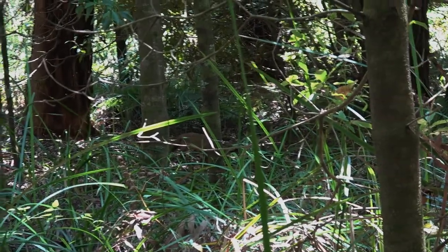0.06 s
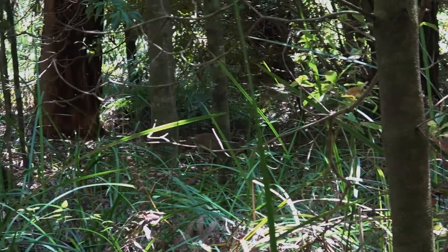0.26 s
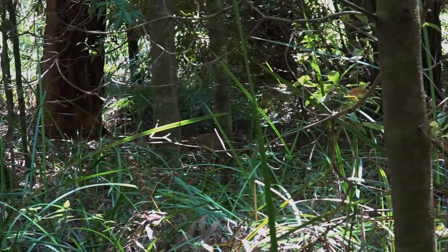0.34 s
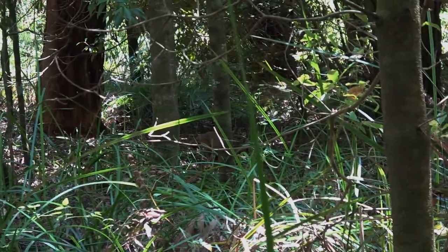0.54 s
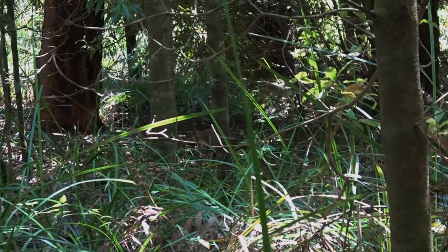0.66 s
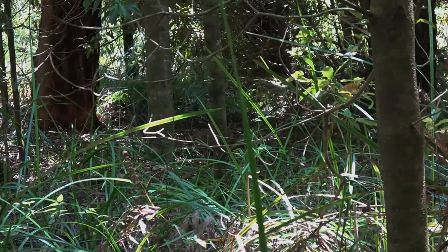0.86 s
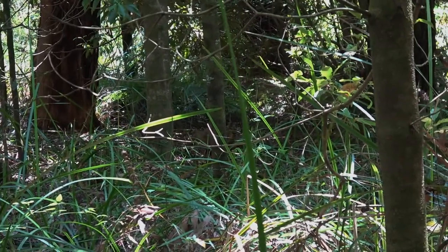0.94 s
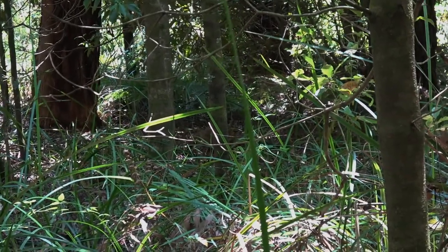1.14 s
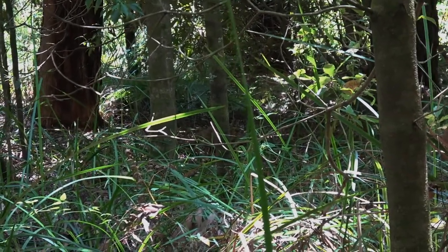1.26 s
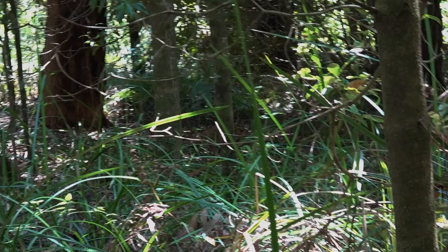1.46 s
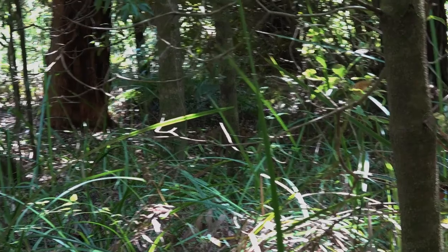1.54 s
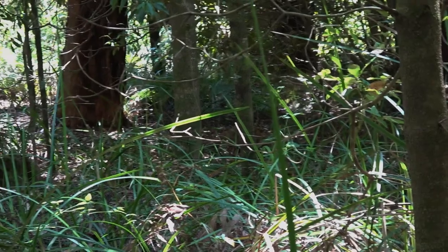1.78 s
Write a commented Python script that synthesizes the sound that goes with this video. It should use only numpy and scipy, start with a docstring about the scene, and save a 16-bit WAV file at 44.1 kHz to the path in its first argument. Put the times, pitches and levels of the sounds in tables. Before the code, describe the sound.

A whipbird holds a thin whistle, then cracks upward like a whip, echoing through trees.

```python
"""Bushland, an eastern whipbird a little right of the microphone. Its thin whistle swells in seven
throbs, dives an octave, pauses and cracks upward like a whip. Trunks and leaves scatter the call into
a long tail. Small birds pipe farther off, over swells of insect hiss and a low, distant drone."""
import sys
import numpy as np
from scipy import signal
from scipy.fft import rfft, irfft
from scipy.io import wavfile
from scipy.ndimage import uniform_filter1d

SR = 44100
rng = np.random.default_rng(int(sys.argv[2]) if len(sys.argv) > 2 else 0)


def bounce(signal):
    """Save signal as a 16-bit WAV file at the path given by the first command-line argument."""
    frames = np.transpose(np.atleast_2d(signal))
    limited = np.clip(frames, -1, 1)
    pcm = np.round(limited * 32767).astype(np.int16)
    wavfile.write(sys.argv[1], SR, pcm)


N = 79380

# the downward glide that takes over from the whistle (time [s], pitch [Hz], relative level [dB])
DIVE_PATH = [(.885, 3445, -52), (.908, 3388, -28), (.928, 2763, -29), (.95, 2450, -31.5), (.974, 2050, -33),
             (.998, 1740, -38), (1.035, 1739, -45)]


def undb(db):
    """Decibels to gain."""
    return 10 ** (np.asarray(db) / 20)


def unit(x):
    """Scale to an rms of 1."""
    return x / np.sqrt(np.mean(x ** 2))


def pan(x, db):
    """Place a sound by its left minus right level."""
    return x * undb(np.array([[.5], [-.5]]) * db)


def per_bin(points):
    """Join (frequency [Hz], level [dB]) points on a log-frequency axis."""
    hz, db = np.array(points, float).T
    return np.interp(np.log(np.fft.rfftfreq(N, 1 / SR) + 1), np.log(hz), db)


def noise(colour, side):
    """Coloured stereo noise; side is the gain of the part that differs between left and right."""
    mid, wide = irfft(rfft(rng.standard_normal((2, N))) * undb(per_bin(colour)), N)
    return unit(mid) + side * unit(wide) * np.array([[1], [-1]])


def band(hz, width):
    """Narrow noise around one frequency; around 0 Hz it is a random waver."""
    f = np.fft.rfftfreq(N, 1 / SR)
    return unit(irfft(rfft(rng.standard_normal(N)) * np.exp(-((f - hz) / width) ** 2), N))


def forest(x, near_db=0, far_db=0):
    """Add quick scatter from near foliage, one echo off a big trunk and a long tail from trees beyond."""
    # colour of the scattered sound (frequency [Hz], level [dB])
    scatter = [(1700, 0.5), (2700, -1), (3400, -2.5), (4200, -1.5), (5200, 3.5), (7500, 2), (12000, -1.5)]
    age = np.maximum(np.arange(N) / SR - .002, 0)  # the first scatter arrives 2 ms late
    near, far = (unit((age > 0) * undb(-60 * age / t60)) / np.sqrt(N) for t60 in (.3, .97))
    grain = irfft(rfft(rng.standard_normal((2, N))) * undb(per_bin(scatter)), N)
    mid, wide = grain * np.hypot(undb(near_db) * near, undb(far_db) * far)
    echoes = mid + .2 * wide * np.array([[1], [-1]])
    trunk = undb(-16) * np.pad(x, (int(.052 * SR), 0))[:N]
    return x + trunk + signal.fftconvolve(x[None], echoes, axes=1)[:, :N]


def syrinx(hz, level, overtones, near_db, far_db):
    """The whipbird's voice through the trees: a nearly pure, wavering tone with faint overtones."""
    waver, full_voice_db, rolloff_hz = .0018, -13, 13000
    phase = 2 * np.pi * np.cumsum(hz * (1 + waver * band(0, 90))) / SR
    effort = (level / undb(full_voice_db)) ** .54  # overtones grow faster than the note itself
    upper = sum(undb(db) * np.sin(k * phase) / np.hypot(1, (k * hz / rolloff_hz) ** 10)
                for k, db in overtones)
    upper = forest(undb(-2) * effort * level * upper, near_db=2.4, far_db=4.5)
    fundamental = forest(level * np.sin(phase), near_db, far_db)
    return np.sqrt(2) * (fundamental + upper)


def whistle(t):
    """One breathy held note that builds in throbs, its pitch sagging within most of them."""
    # throbs (start [s], peak [s], end [s], relative level [dB], first pitch [Hz], last pitch [Hz])
    throbs = [(-.02, .05, .08, -33.5, 3720, 3555), (.112, .168, .206, -29, 3600, 3510),
              (.25, .298, .324, -23, 3610, 3525), (.374, .42, .474, -22.5, 3580, 3510),
              (.497, .535, .572, -22, 3600, 3480), (.615, .686, .707, -15.5, 3555, 3555),
              (.757, .82, .842, -16, 3650, 3430)]
    # overtones of the whistle (multiple of the pitch, relative level [dB])
    overtones = [(2, -49.5), (3, -42)]
    # air in the whistle (frequency [Hz], relative level [dB])
    breath_colour = [(2000, -38.5), (2450, -18.5), (2720, -7), (3050, -6), (3450, 5), (3800, -3),
                     (4200, -29.5), (6000, -42)]
    held_db, held_hz = -22.5, 3523  # the note carries on this far below the throbs
    _, peaks, ends, peak_db, _, _ = np.array(throbs).T
    fade_into_dive = np.interp(t, [ends[-1], DIVE_PATH[1][0]], [1, 0])
    level = undb(np.interp(t, peaks, peak_db) + held_db) * fade_into_dive + 1e-9
    weighted_hz = level * held_hz
    for start, peak, end, db, first_hz, last_hz in throbs:
        rise = np.clip((t - start) / (peak - start), 0, 1)
        fall = np.clip((end - t) / (end - peak), 0, 1)
        throb = undb(db) * np.sin(rise * np.pi / 2) ** 2 * np.sin(fall * np.pi / 2) ** 1.49
        sag = np.clip((t - start) / (end - start), 0, 1) ** .7
        level += throb
        weighted_hz += throb * (first_hz + (last_hz - first_hz) * sag)
    breath = undb(-28.5) * level * noise(breath_colour, side=0)[0]
    return syrinx(weighted_hz / level, level, overtones, near_db=-26, far_db=-15) + forest(breath)


def small_bird_note(t, start, length, first_hz, last_hz, db):
    """A rounded, pure note with a slight waver in pitch."""
    progress = np.clip((t - start) / length, 0, 1)
    hz = (first_hz + (last_hz - first_hz) * progress) * (1 + .0061 * band(0, 150))
    envelope = undb(db) * np.sqrt(2 * np.abs(np.sin(np.pi * progress)))
    return envelope * np.sin(2 * np.pi * np.cumsum(hz) / SR)


def small_birds(t):
    """Steady pipings and slurred chirps from deeper in the trees."""
    # thin notes on one pitch (start [s], length [s], pitch [Hz], relative level [dB])
    pipe_notes = [(-.03, 0.1, 5505, -55), (0.062, 0.17, 5494, -70.5), (0.052, 0.15, 4910, -68.5),
                  (1.398, 0.044, 4963, -44), (1.525, .06, 4963, -52.5), (1.542, 0.024, 6112, -45.5),
                  (1.58, 0.049, 6065, -51), (1.706, 0.048, 5165, -47.5), (1.788, 0.058, 5170, -41)]
    # short slurs (start [s], length [s], first pitch [Hz], last pitch [Hz], relative level [dB])
    chirp_notes = [(1.295, 0.035, 1512, 1330, -62.5), (1.414, 0.032, 2745, 2585, -56.5),
                   (1.505, 0.026, 2120, 2440, -58), (1.576, 0.019, 7230, 7900, -51),
                   (1.581, 0.029, 7380, 8300, -57), (1.722, .035, 3830, 2860, -58),
                   (1.76, 0.029, 3000, 3710, -60)]
    pipes = sum(small_bird_note(t, start, length, hz, hz, db) for start, length, hz, db in pipe_notes)
    chirps = sum(small_bird_note(t, *row) for row in chirp_notes)
    return pan(forest(pipes, near_db=-16, far_db=-2) + forest(chirps), -2)


def swells(t, rows):
    """Soft, bell-shaped rises and falls of level."""
    return sum(undb(db) * np.exp(-.5 * ((t - middle) / width) ** 2) for middle, width, db in rows)


def insects_and_air(t):
    """Two kinds of fluttering insect hiss swell over the steady air, spread around the microphone."""
    # the broad insect hiss (frequency [Hz], relative level [dB])
    hiss_colour = [(3500, -29), (4800, -2), (6000, 2), (7500, 4), (9000, -2), (10500, -14), (13000, -11),
                   (15500, -16)]
    # swells of the broad hiss (middle [s], half width [s], relative level [dB])
    broad_swells = [(.155, 0.028, -60), (.405, 0.041, -56), (.57, 0.054, -58), (.71, 0.045, -60.5),
                    (0.839, 0.056, -67.5), (0.998, 0.043, -61), (1.63, 0.042, -70), (1.75, 0.057, -64)]
    # swells of a thinner, higher hiss (middle [s], half width [s], relative level [dB])
    thin_swells = [(.14, .035, -68.5), (1.02, 0.11, -73), (1.24, 0.048, -66.5), (1.62, 0.044, -68.5)]
    # the still air of the bush (frequency [Hz], relative level [dB])
    air_colour = [(600, -44), (1400, -5), (1900, -1), (2700, -2), (4000, -1), (6000, 0.5), (8000, -6),
                  (10000, -11), (13000, -7.5), (15500, -24)]
    broad = noise(hiss_colour, side=.39) * swells(t, broad_swells)
    thin = band(hz=12460, width=1600) * swells(t, thin_swells)
    flutter = undb(.66 * band(0, 50))
    air = undb(-61.5) * noise(air_colour, side=.39)
    return pan((broad + thin) * flutter + air, -.5)


def drone():
    """A far, low wash with two narrow, wavering hums in it."""
    # the low wash (frequency [Hz], relative level [dB])
    colour = [(20, -6.5), (40, -4.5), (60, 3.5), (85, -3.5), (100, -6.5), (118, -0.5), (150, -12.5),
              (250, -10), (400, -9), (590, -4), (760, -4), (900, -12), (1080, -8.5), (1300, -17.5),
              (1600, -24), (2500, -57)]
    # where each part of the wash sits (frequency [Hz], left minus right [dB])
    balance = [(60, -0.5), (120, 0.5), (200, -4), (350, 4.5), (700, 0.5), (1000, 3.5), (1300, -9.5)]
    # hums (frequency [Hz], width [Hz], level [dB], left minus right [dB])
    hum_bands = [(76.6, 7.6, -57, -3.5), (1183.4, 69.6, -59.5, -13.5)]
    wash = irfft(pan(rfft(noise(colour, side=.23)), per_bin(balance)), N)
    hums = sum(pan(undb(db) * band(hz, width), lean) for hz, width, db, lean in hum_bands)
    return undb(-51.5) * wash + hums


def glide(t, path, overtones, near_db, far_db):
    """A fast, uneven sweep of the whipbird's voice, smeared into a band of noise by the echoes."""
    edge_s, surge_db, unevenness_hz, wobble = .0018, 2.5, 89.5, .0051
    times, hz, db = np.array(path).T
    gate = np.clip(np.minimum(t - times[0], times[-1] - t) / edge_s, 0, 1)
    pitch = uniform_filter1d(np.interp(t, times, hz), size=300) * (1 + wobble * band(0, unevenness_hz))
    level = gate * undb(np.interp(t, times, db) + surge_db * band(0, unevenness_hz))
    return syrinx(pitch, level, overtones, near_db, far_db)


def dive(t):
    """The whistle drops an octave and fades."""
    # overtones, stronger than in the whistle (multiple of the pitch, relative level [dB])
    overtones = [(2, -33), (3, -34)]
    return glide(t, DIVE_PATH, overtones, near_db=-4, far_db=-6.5)


def whip_crack(t):
    """After a pause the voice shoots up more than an octave and rings through the trees."""
    # the upward glide (time [s], pitch [Hz], relative level [dB])
    path = [(1.112, 3370, -46), (1.127, 3273, -25.5), (1.143, 3532, -21), (1.16, 3905, -21.5),
            (1.177, 4676, -25), (1.192, 5600, -28), (1.208, 6600, -32.5), (1.22, 7020, -33.5),
            (1.232, 7780, -51)]
    # overtones of the crack (multiple of the pitch, relative level [dB])
    overtones = [(2, -36), (3, -34.5)]
    return glide(t, path, overtones, near_db=-2.5, far_db=-7)


def scene():
    """The whipbird in front and a little to the right, the rest of the bush behind it."""
    t = np.arange(N) / SR
    whipbird = whistle(t) + dive(t) + whip_crack(t)
    return pan(undb(-1.2) * whipbird, -4.8) + small_birds(t) + insects_and_air(t) + drone()


def record(dry):
    """The recorder cuts the top treble steeply."""
    top_hz = 15650
    return signal.sosfilt(signal.ellip(10, .2, 80, top_hz, fs=SR, output="sos"), dry)


dry = scene()
out = record(dry)
bounce(out)
```